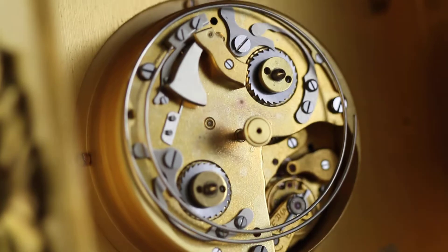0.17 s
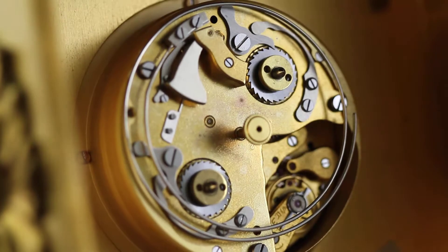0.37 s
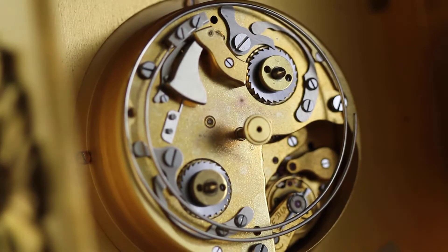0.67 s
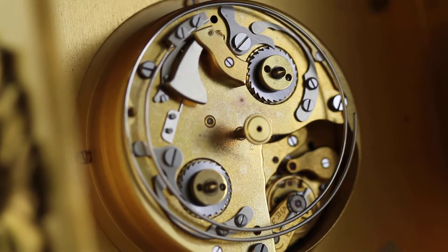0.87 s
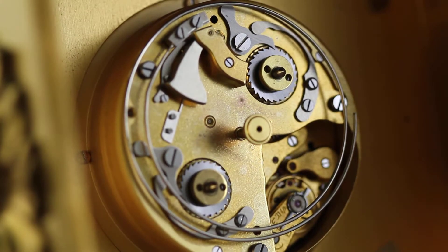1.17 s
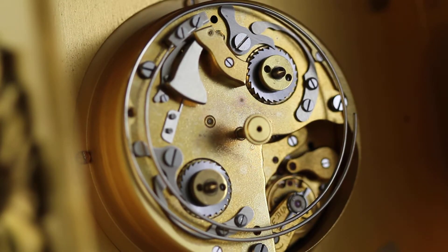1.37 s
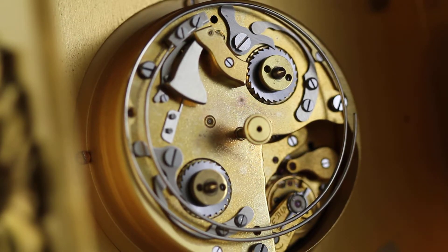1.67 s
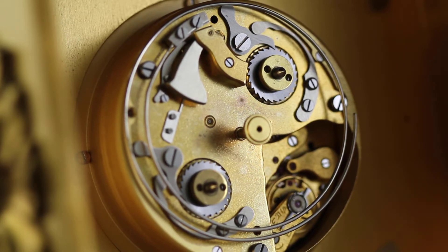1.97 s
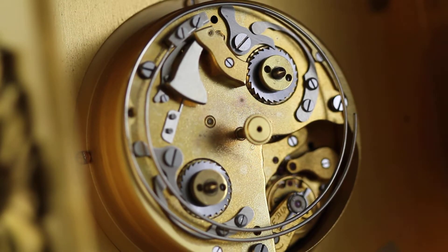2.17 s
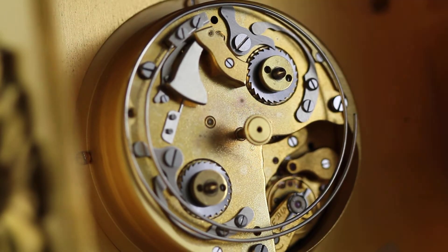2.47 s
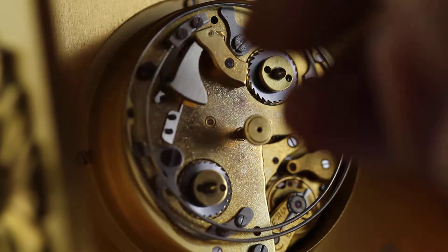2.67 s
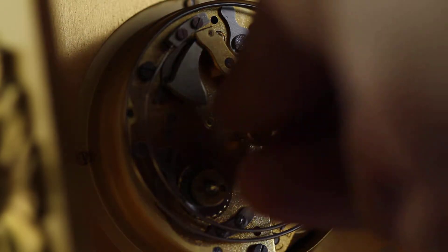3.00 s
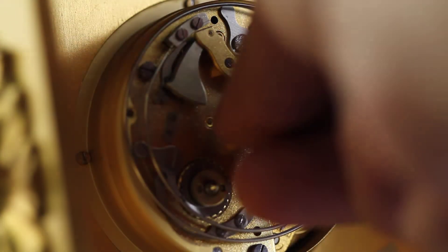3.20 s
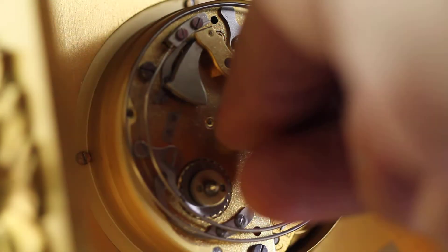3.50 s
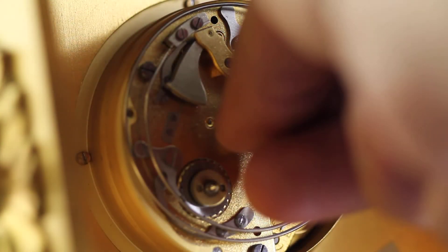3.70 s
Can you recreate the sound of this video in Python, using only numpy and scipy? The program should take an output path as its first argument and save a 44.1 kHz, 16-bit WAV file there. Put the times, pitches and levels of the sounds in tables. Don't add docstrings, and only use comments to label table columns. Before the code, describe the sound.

Close, nearly mono clockwork ticking, thin and bright, over soft appliance hum and slowly swelling distant insects; a short cloth scuff and tiny taps come after two seconds, then a loud bright metal click.

```python
import sys
import numpy as np
from scipy import signal
from scipy.fft import rfft, irfft
from scipy.io import wavfile
from scipy.ndimage import uniform_filter1d

SR = 44100
rng = np.random.default_rng(int(sys.argv[2]) if len(sys.argv) > 2 else 0)


def undo_db(level):
    steps = np.asarray(level, float) / 20
    return 10 ** steps


def master(y):
    cut = np.clip(np.atleast_2d(y).T, -1, 1)
    pcm = np.round(cut * 32767)
    wavfile.write(sys.argv[1], SR, pcm.astype(np.int16))


N = 169785


def unit(x):
    return x / np.sqrt(np.mean(x ** 2))


def band(hz, width):
    b, a = signal.iirpeak(hz, hz / width, fs=SR)
    once = signal.lfilter(b, a, rng.standard_normal(N))
    return unit(signal.lfilter(b, a, once))


def colour(points):
    hz = np.arange(N // 2 + 1) * SR / N + 1
    point_hz, point_db = np.array(points).T
    gain = undo_db(np.interp(np.log(hz), np.log(point_hz), point_db))
    return unit(irfft(rfft(rng.standard_normal(N)) * gain, N))


def walk(rate):
    k = int(SR / rate)
    return unit(uniform_filter1d(uniform_filter1d(rng.standard_normal(N), k), k))


def strokes(t, rows):
    power = 0
    for centre, rise, fall, db in rows:
        power = power + undo_db(2 * db) * np.exp(-((t - centre) / np.where(t < centre, rise, fall)) ** 2)
    return np.sqrt(power)


def strike(out, s, db, contact, modes, scatter_db):
    hz, mode_db, t60 = np.array(modes).T[:, :, None]
    t = np.arange(512 + int(t60.max() * SR)) / SR
    size, detune, phase = rng.standard_normal((3, len(modes), 1))
    ring = undo_db(mode_db + scatter_db * size) * np.sin(2 * np.pi * (hz * (1 + 0.0031 * detune) * t + phase))
    onset = 1 - np.exp(-t / 0.0001)
    ring = (ring * np.exp(-np.log(1000) * t / t60) * onset).sum(0)
    push = rng.standard_normal(512) * np.exp(-t[:512] / max(contact, 1e-6) * 2)
    push[0] = 1.5
    push = push / np.sqrt(np.sum(push ** 2))
    start = int(s * SR)
    hit = signal.fftconvolve(ring, push)[:N - start]
    out[start:start + len(hit)] += undo_db(db) * hit


# (frequency [Hz], level per Hz [dB])
AIR_COLOUR = [(15, -49), (25, -24), (113, -11), (174, -12.5), (211, -7), (449, -20), (857, -17.5),
              (5980, -31.5), (15800, -37.5)]
AIR_DB, AIR_FLICKER_DB = -49.5, .4


def room_air():
    return undo_db(AIR_DB + AIR_FLICKER_DB * walk(18)) * colour(AIR_COLOUR)


# (frequency [Hz], width [Hz], level [dB rms])
HUM = [(56, 17, -70), (120.9, 12.2, -60.5), (145.1, 27, -59), (204.1, 12.7, -65), (240.1, 15, -56.5),
       (263.3, 24, -59), (289.2, 22, -68), (385.7, 34, -62.5), (771, 22, -78.5), (894, 8, -73.5)]


def appliance_hum():
    return sum(undo_db(db) * band(hz, width) for hz, width, db in HUM)


# (frequency [Hz], level [dB rms])
MOTOR = [(120, -60.5), (207, -49), (240, -63.5), (471, -71.5), (880, -62)]
MOTOR_WOBBLE_DB, MOTOR_DRIFT = 2, .002


def motor():
    out = np.zeros(N)
    for hz, db in MOTOR:
        level = np.sqrt(2) * undo_db(db + MOTOR_WOBBLE_DB * walk(9.2))
        pitch = hz * (1 + MOTOR_DRIFT * walk(4.7))
        out += level * np.sin(2 * np.pi * np.cumsum(pitch) / SR)
    return out


# (time [s], level [dB rms])
CHORUS_SWELL = [(.1, -71.5), (.8, -67), (1.4, -60.5), (2.2, -56), (2.8, -55), (3.5, -53), (3.85, -52)]
# (frequency [Hz], width [Hz], level [dB])
CHORUS_BANDS = [(2040, 1860, -4.5), (3390, 35, -14), (4605, 49, -10.5), (5760, 540, -5), (6160, 230, -1),
                (6580, 400, -7), (7120, 82, -16.5), (6140, 2800, -2)]


def insect_chorus(t):
    swell_s, swell_db = np.array(CHORUS_SWELL).T
    song = sum(undo_db(db + 2.1 * walk(10)) * band(hz, width) for hz, width, db in CHORUS_BANDS)
    return undo_db(np.interp(t, swell_s, swell_db)) * song


# (centre [s], rise [s], fall [s], level [dB rms])
SHIFTS = [
    (.2, .06, .06, -59.5),
    (.52, .08, 0.062, -53),
    (2.3, 0.05, 0.087, -56.5),
    (2.53, .08, .06, -54),
]
# (frequency [Hz], level per Hz [dB])
SHIFT_COLOUR = [(200, -9), (400, -2.5), (1500, 2), (4000, -9), (9000, -18)]


def arm_shifts(t):
    return strokes(t, SHIFTS) * colour(SHIFT_COLOUR)


# (centre [s], rise [s], fall [s], level [dB rms])
RUBS = [(.2, .07, 0.064, -55.5), (.52, 0.051, 0.038, -55), (1.8, .04, 0.1, -56), (2.035, 0.017, .03, -43.5),
        (2.092, 0.025, 0.028, -31.5), (2.13, 0.028, 0.019, -34.5), (2.17, .015, .02, -49),
        (2.27, 0.027, 0.023, -50.5), (2.39, 0.038, 0.051, -55), (1.94, .02, 0.036, -57.5),
        (3.66, 0.013, 0.014, -58)]
# (frequency [Hz], level per Hz [dB])
CLOTH = [(410, -49), (700, -28), (1490, 0.5), (1740, -7), (4230, -7), (4820, -5.5), (5350, -4), (13200, -4),
         (15800, -10)]
# (frequency [Hz], width [Hz], level [dB rms])
FOLD = [(1165, 200, -44.5), (1404, 180, -38), (4210, 340, -39), (5600, 450, -40)]
FOLD_S, FOLD_WIDTH_S = 2.09, 0.014
CLOTH_GRAIN_DB = 1.2


def sleeve(t):
    squeeze = np.exp(-np.abs(t - FOLD_S) / FOLD_WIDTH_S)
    fold = squeeze * sum(undo_db(db) * band(hz, width) for hz, width, db in FOLD)
    grain = undo_db(CLOTH_GRAIN_DB * walk(400))
    return (strokes(t, RUBS) * colour(CLOTH) + fold) * grain


# (time [s], level [dB], frequency [Hz], t60 [s])
KNOCKS = [(2.281, -39, 1400, .015), (2.282, -39, 1900, .015), (2.289, -40, 2200, .018),
          (2.29, -43, 2500, .012), (2.314, -43, 1600, .012), (2.519, -40, 1150, .022),
          (2.455, -50, 2100, .08)]
# (time [s], level [dB], frequency [Hz], t60 [s])
FIRST_RING = [
    (3.7262, -33, 870, .06),
    (3.7268, -24, 3760, .04),
    (3.738, -36, 11900, .12),
]


def knocks():
    out = np.zeros(N)
    for s, db, hz, t60 in KNOCKS + FIRST_RING:
        strike(out, s, db, 1e-5, [(hz, 0, t60), (hz * 1.13, -5, t60)], 1)
    return out


# (frequency [Hz], level [dB], t60 [s])
BASE = [(380, -9, .1), (759, 0, .12), (950, -8, .1), (1370, -6, .1), (1475, -4, .12), (1700, -9, .06)]
# (time [s], level [dB])
BASE_BLOWS = [
    (3.737, -34),
]


def wooden_base():
    out = np.zeros(N)
    for s, db in BASE_BLOWS:
        strike(out, s, db, 1e-5, BASE, 1)
    return out


# (time [s], level [dB], contact length [s])
CLICK = [(3.7225, -24, .001), (3.7245, -27, .001), (3.7264, -17, .0003), (3.7273, -15, .0003),
         (3.7282, -14, .0003), (3.7292, -17, .0003), (3.733, -25, .001), (3.7365, -25, .001),
         (3.746, -33, .002), (3.757, -36, .002), (3.768, -38, .002)]
# (frequency [Hz], level [dB], t60 [s])
CASE = [(1900, -26, 0.024), (2902, -14, 0.066), (3400, -11, .02), (4470, -13, 0.022), (5170, -9, .02),
        (5900, -9, 0.022), (7300, -4, .02), (8800, -3, .015), (10400, 4.5, 0.026), (11150, 3, 0.022),
        (12200, 0, .025), (12930, 6, .015), (14220, -6, .015), (15200, -1, 0.017)]
TAIL_DB, TAIL_T60_S = -32.5, 0.15


def brass_click(t):
    out = np.zeros(N)
    for s, db, contact in CLICK:
        strike(out, s, db - 13, contact, CASE, 1.5)
    late = t - CLICK[2][0]
    tail = (late > 0) * np.exp(-np.log(1000) * np.abs(late) / TAIL_T60_S)
    tail_noise = colour([(500, -0.5), (3000, 3.5), (7000, 0), (12000, 1.5), (16000, -10)])
    return out + undo_db(TAIL_DB) * tail * tail_noise


# (time of the drop [s], peak level [dB])
TICKS = [(0.2463, -39.5), (0.4509, -41), (0.6459, -39), (0.851, -39), (1.0456, -38), (1.2507, -37.5),
         (1.4473, -36.5), (1.6511, -36.5), (1.8467, -37.5), (2.0504, -43), (2.2468, -42), (2.4523, -39.5),
         (2.6474, -37.5), (2.8524, -40.5), (3.048, -35.5), (3.253, -36.5), (3.4484, -33), (3.6526, -38.5),
         (3.8474, -37)]
# (time after the drop [s], level [dB])
BEAT = [
    (-.0085, -13),
    (-.0065, -5),
    (-.004, -15),
    (0, 1),
    (.0012, -1.5),
    (.0025, -4),
    (.004, -9),
    (.006, -5),
    (.009, -10),
    (.016, -14),
]
# (frequency [Hz], level [dB], t60 [s])
PLATE = [(4960, -7, 0.0096), (7550, -3, 0.006), (8700, -13, .008), (9570, -10.5, .012), (10600, -10, 0.012),
         (11230, -4, 0.011), (11510, -2.5, 0.011), (11900, -3.5, 0.0091), (12600, -5, .012),
         (13250, -3, .014), (13750, -9, .012), (14300, -10, .01), (14800, -10, .01), (15600, -8, .01)]
TICK_DB, TICK_SCATTER_DB, CONTACT_S = -8.5, 4, .0002


def escapement():
    out = np.zeros(N)
    for s, db in TICKS:
        for lag, part_db in BEAT:
            if s + lag < (N - 9) / SR:
                strike(out, s + lag, db + part_db + TICK_DB, CONTACT_S, PLATE, TICK_SCATTER_DB)
    return out


def scene():
    t = np.arange(N) / SR
    background = room_air() + appliance_hum() + motor() + insect_chorus(t)
    handling = arm_shifts(t) + sleeve(t) + knocks() + wooden_base() + brass_click(t)
    mono = background + handling + escapement()
    side = undo_db(-36) * np.diff(np.roll(handling, 9), prepend=0)
    return np.array([mono + side, mono - side])


def band_limit(x):
    return signal.sosfilt(signal.butter(12, 17000, fs=SR, output="sos"), x)


START_S, LOW_CUT_HZ, TOP_HZ = .0722, 38, 15780


def record(dry):
    t = np.arange(N) / SR
    low_cut = signal.lfilter(*signal.butter(4, LOW_CUT_HZ, "high", fs=SR), dry)
    top_cut = signal.ellip(16, .5, 90, TOP_HZ, fs=SR, output="sos")
    fade_in = np.clip((t - START_S) / 0.00076, 0, 1)
    mix = signal.sosfilt(top_cut, low_cut) * fade_in
    return band_limit(mix)


dry = scene()
out = record(dry)
master(out)
```